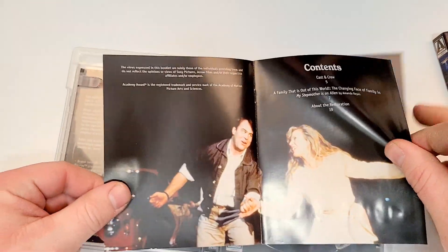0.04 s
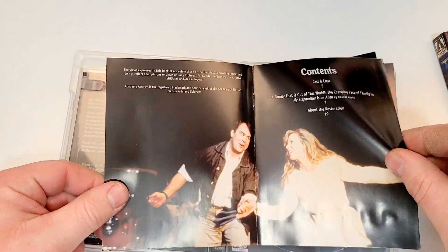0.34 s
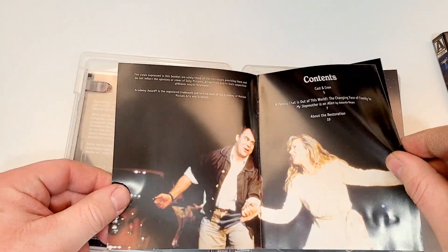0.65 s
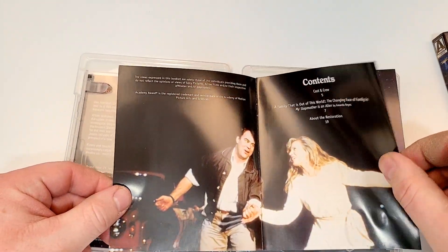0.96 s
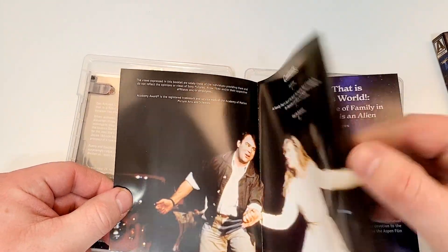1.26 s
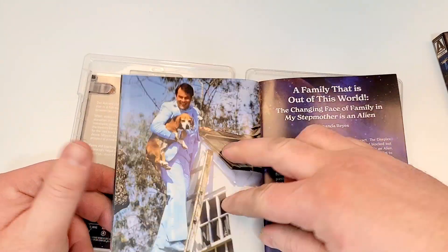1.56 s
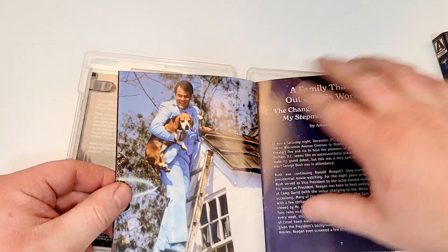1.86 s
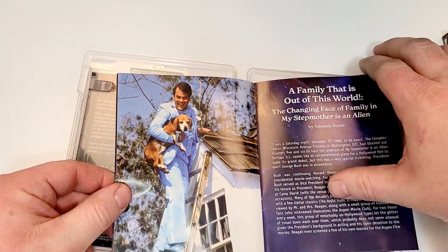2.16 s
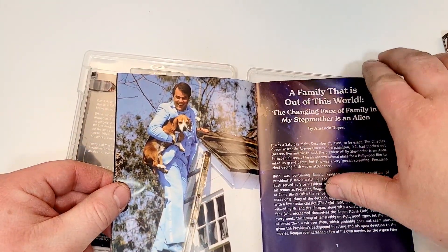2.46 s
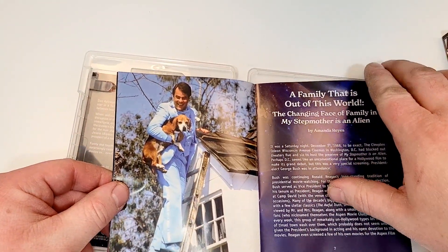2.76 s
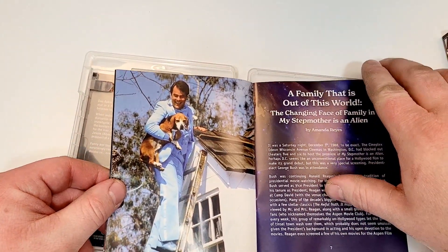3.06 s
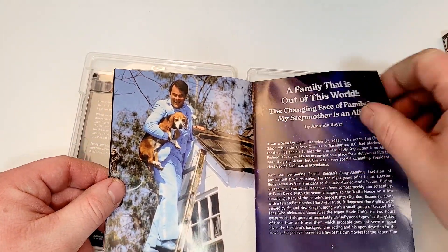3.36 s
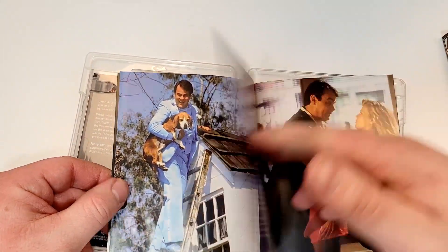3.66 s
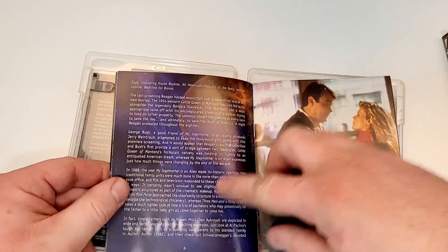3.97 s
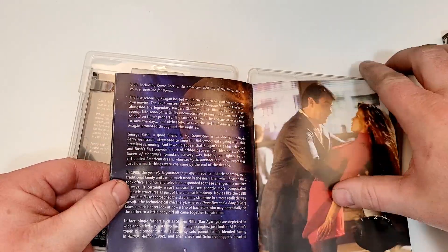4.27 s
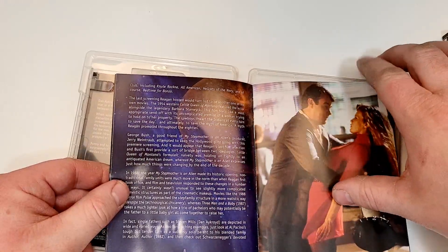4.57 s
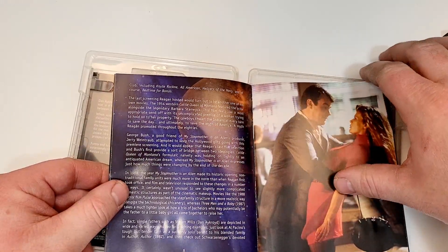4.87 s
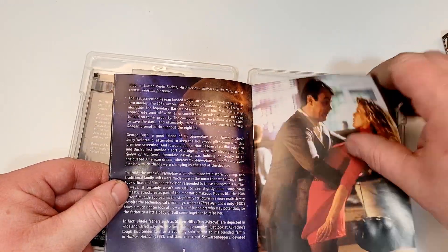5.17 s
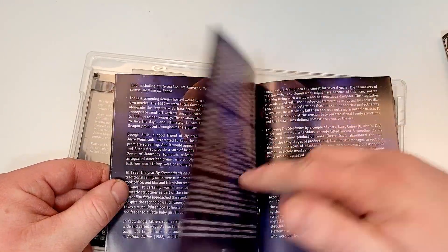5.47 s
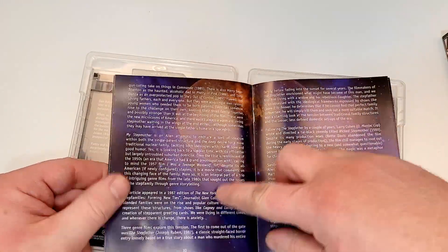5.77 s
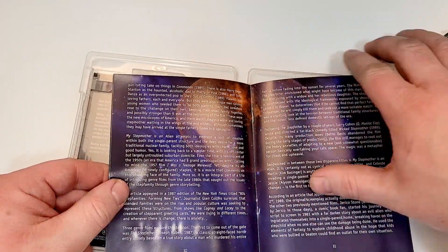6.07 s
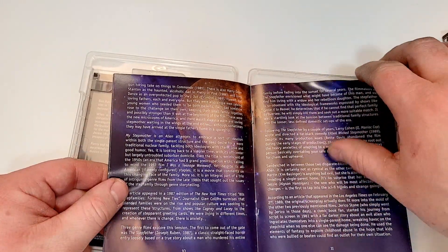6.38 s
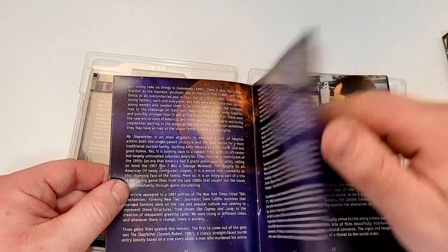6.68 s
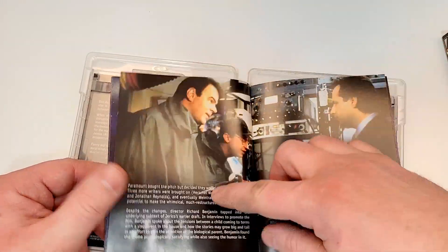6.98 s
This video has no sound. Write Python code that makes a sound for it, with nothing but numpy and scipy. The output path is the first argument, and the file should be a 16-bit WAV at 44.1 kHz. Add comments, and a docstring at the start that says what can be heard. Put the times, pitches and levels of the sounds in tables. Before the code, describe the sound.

Hands turn four glossy pages of a small booklet on a table, heard close in a small room. From the start the paper rustles and flexes, with a flick at about 0.7 seconds and a faint, thin squeal around 1 second. The first page snaps and flaps over between 1.2 and 1.5 seconds. Quiet sliding and tiny ticks follow. From 3 to 3.5 seconds come loud, sharp snaps as the second sheet buckles, and it flutters down by 3.8 seconds. Lighter clicks and finger slides continue until the third page flaps over at about 5.5 seconds. Crisp snaps near 6.4 seconds and a loud crack at 6.8 mark the fourth turn, which settles with small flaps just after 7 seconds. Soft, low puffs of air and a faint hiss lie underneath, along with a low drone that grows slightly from about 5 seconds.

```python
"""Sharp paper snaps, flaps and rustles: hands turn four glossy pages of a small booklet on a table,
close by in a small room. A stiff sheet buckles with an impulse that sends bending waves across it,
then swings over and flaps down, ringing the air pocket beneath it. Stick-slip friction of fingers
and pages gives the rustle and one thin squeal. Soft puffs of air, a low drone and a faint hiss
lie underneath."""
import sys
import numpy as np
from scipy import signal
from scipy.fft import rfft, irfft, next_fast_len
from scipy.io import wavfile
from scipy.ndimage import uniform_filter1d, map_coordinates

SR = 44100
rng = np.random.default_rng(int(sys.argv[2]) if len(sys.argv) > 2 else 0)


def transcribe(u):
    """Save the signal u as a 16-bit wav file named by the first command-line argument.

    u: samples, shape (n,) or (channels, n), limited to [-1, 1]; the rate is SR.
    q: integer samples, one column per channel.
    """
    v = np.clip(np.atleast_2d(u).T, -1, 1)
    q = np.round(v * 32767).astype(np.int16)
    wavfile.write(sys.argv[1], SR, q)


N = 318843

# a sheet buckles or its edge slips off a finger: start_s, peak_db, edge_db, ring_t60_s
SNAPS = [(0.054, -19, -5.5, 0.076), (0.221, -23, 16, 0.02), (0.657, -12, -0.5, 0.029),
         (1.188, -12, -6.5, 0.048), (1.202, -6.5, -4, 0.026), (1.25, -15, 8, 0.0081),
         (1.4, -19, -11, 0.018), (1.517, -24, -2, 0.019), (1.629, -26, 13, 0.033),
         (2.019, -31.5, 0.5, 0.026), (2.17, -37, 0, 0.021), (2.429, -33.5, 1, 0.024),
         (2.656, -29.5, 14, 0.025), (2.726, -31, 4, 0.041), (2.9443, -16, 8, 0.025),
         (2.9934, -20.5, 21, 0.024), (3.011, -33, 17, 0.055), (3.0992, 1.5, 2.5, 0.014),
         (3.1408, -20.5, 0, 0.016), (3.2033, -22, 3.5, 0.063), (3.2545, -13.5, -4, 0.026),
         (3.3556, 1, -4.5, 0.032), (3.416, 1.5, 18, 0.014), (3.51, -17, 7, 0.012), (3.585, -21.5, 5, 0.029),
         (3.973, -20.5, -1.5, 0.075), (4.152, -24, -9, 0.042), (4.287, -19.5, 8, 0.031),
         (4.305, -13.5, 10, 0.028), (4.893, -15.5, 12.5, 0.018), (4.9171, -16, 7.5, 0.049),
         (6.29, -26, 5, 0.045), (6.333, -21, 3, 0.022), (6.3517, -2.5, -0.5, 0.017),
         (6.446, -5.5, 3, 0.024), (6.7736, -19.5, 6, 0.013), (6.8211, 0.5, 13.5, 0.026),
         (7.1532, -16.5, 16, 0.01)]
# spectrum of a snap: frequency_hz, gain_db
SNAP_SPECTRUM = [(40, -35), (150, 4.5), (1100, -5.5), (1800, 3), (3000, -2), (5000, -6.5), (9500, -14.5),
                 (16000, -24)]


def snaps(shiver=0.23):
    """Buckling: one sudden impulse, then decaying bending waves that cross the sheet."""
    out, t = np.zeros(N), np.arange(SR // 8) / SR
    for start_s, peak_db, edge_db, t60 in SNAPS:
        body_db = -7 - 0.63 * edge_db - 0.18 * peak_db  # a tight, hard snap moves little paper
        kick = shiver * rng.standard_normal(len(t)) * amp(-60 * t / t60)
        kick[0] = -1
        snap = filtered(kick, lambda hz: along(SNAP_SPECTRUM, hz) + booklet(hz)
                        + radiation(hz, body_db, edge_db))
        snap = table_echo(snap, delay_s=.00083, share=.45)
        add(out, start_s, amp(peak_db) * snap / np.abs(snap).max())
    return out


def radiation(hz, body_db, edge_db, body_hz=800, edge_hz=4200):
    """Radiator size, as gain in dB: a large moving area adds bass, a tight crease adds treble."""
    return body_db / (1 + (hz / body_hz) ** 4) + edge_db * (1 - 1 / (1 + (hz / edge_hz) ** 4))


def table_echo(x, delay_s, share):
    """Dipole reflection: the sheet's back radiates in opposite phase and returns off the table."""
    return x - share * np.pad(x, (round(delay_s * SR), 0))[:len(x)]


# a bowed sheet flaps over or lands: start_s, peak_db, pocket_pitch_hz, flutter_t60_s
FLAPS = [(0.668, -9.5, 1870, 0.12), (0.723, -22.5, 1390, 0.072), (1.214, -10.5, 1450, 0.22),
         (1.261, -16, 1110, 0.11), (1.4142, -3, 1790, 0.17), (1.9027, -22.5, 1840, 0.2),
         (2.264, -38, 950, 0.029), (2.358, -44, 1780, 0.038), (3.459, -9, 1600, 0.03),
         (3.61, -17.5, 1480, 0.31), (3.641, -18.5, 1280, 0.12), (3.724, -22, 1700, 0.025),
         (3.735, -15.5, 1680, 0.089), (5.26, -22.5, 1090, 0.07), (5.314, -25, 1400, 0.06),
         (5.363, -22, 1400, 0.059), (5.522, -13, 1660, 0.049), (5.535, -8, 1740, 0.14),
         (6.722, -24, 1020, 0.089), (6.831, -17.5, 1850, 0.044), (6.922, -26.5, 1610, 0.044),
         (7.032, -26.5, 1830, 0.034), (7.127, -23, 990, 0.017)]
# spectrum of a flap: frequency_hz, gain_db
FLAP_SPECTRUM = [(40, -1), (150, -20), (1500, -6.5), (2600, -7.5), (8000, -28.5), (16000, -41)]


def flaps(lead_s=.02, slap_t60_s=0.03, settle_s=0.006, neutral_hz=1640, body_db_per_octave=22.5):
    """Impact and settling: a bright slap, then a weaker, lower and duller flutter."""
    out, t = np.zeros(N), np.arange(SR // 4) / SR - lead_s
    for start_s, peak_db, pitch_hz, t60 in FLAPS:
        body_db = body_db_per_octave * np.log2(neutral_hz / pitch_hz)  # bigger pocket: lower, fuller
        slap = contact(t, pitch_hz, min(t60, slap_t60_s), body_db, edge_db=3.5)
        settle = contact(t, 0.96 * pitch_hz, t60, body_db, edge_db=-12.5)
        add(out, start_s - lead_s, amp(peak_db) * slap)
        add(out, start_s + settle_s - lead_s, amp(peak_db - 6) * settle)
    return out


def contact(t, pitch_hz, t60, body_db, edge_db, rise_s=0.0028):
    """Noise excitation: the sheet brushes closer, then shudders and rings its air pocket; peak 1."""
    envelope = np.where(t < 0, np.exp(-np.abs(t) / rise_s), amp(-60 * np.abs(t) / t60))
    shudder = rng.standard_normal(len(t)) * envelope
    flap = filtered(shudder, lambda hz: along(FLAP_SPECTRUM, hz) + booklet(hz)
                    + pocket(hz, pitch_hz, ring_db=11, width=0.18) + radiation(hz, body_db, edge_db))
    return flap / np.abs(flap).max()


def pocket(hz, pitch_hz, ring_db, width):
    """Cavity resonance under a bowed sheet, as gain in dB; width is a share of its pitch."""
    return ring_db / (1 + ((hz / pitch_hz - 1) / width) ** 2)


# spectra of a page swinging, flexing and sliding: frequency_hz, gain_db
SWING_SPECTRUM = [(60, -40), (180, -4), (380, 2), (600, -4.5), (850, -6), (1400, -8), (3000, -26)]
FLEX_SPECTRUM = [(400, -50.5), (850, -1.5), (1300, -4.5), (1800, 4.5), (2400, -4.5), (3300, -6.5),
                 (5000, -11), (12000, -32)]
SLIDE_SPECTRUM = [(1200, -21.5), (3000, -7.5), (4200, -1), (5200, -4), (6200, 1), (7000, -3.5), (8200, -2),
                  (10000, -2.5), (12500, -5.5), (15500, -8)]


def rustle(grip_db=2.5, grip_rate_hz=70, pockets_hz=(1080, 1760, 2900)):
    """Modulated friction noise: the fingers' uneven grip shakes swing, flex and slide together."""
    swing_db, flex_db, slide_db = page_motion()
    swing = amp(swing_db - 7.5) * friction(SWING_SPECTRUM, slips_per_s=160, spread_db=2.0, smooth=0.69)
    bending = friction(FLEX_SPECTRUM, slips_per_s=220, spread_db=12.5, smooth=2.7)
    hollow, bowed, tight = [unit(filtered(bending, lambda hz: pocket(hz, pitch, ring_db=7, width=0.16)))
                            for pitch in pockets_hz]
    # a sliding page lies flat and sounds high; as it lifts, its pocket grows and the pitch falls
    flatness = np.clip((slide_db - swing_db + 5) / 12, -1, 1)
    lifted, flat = np.maximum(-flatness, 0), np.maximum(flatness, 0)
    flex = amp(flex_db - 8) * (lifted * hollow + (1 - lifted - flat) * bowed + flat * tight)
    slide = amp(slide_db - 2.5) * friction(SLIDE_SPECTRUM, slips_per_s=470, spread_db=3, smooth=1.5)
    paper = shape_shift(filtered(swing + flex + slide, booklet))
    return paper * amp(grip_db * wobble(grip_rate_hz))


# a finger or page edge slides over the gloss: start_s, length_s, hiss_db, flex_over_hiss_db
SLIDES = [(0.106, 0.051, -43, 6), (0.214, 0.031, -38, 8.5), (0.633, 0.063, -39.5, 11),
          (1.116, 0.18, -41.5, 7), (1.302, 0.056, -44.5, 9), (1.592, 0.1, -45.5, 3.5),
          (1.745, 0.42, -49, 5), (2.118, 0.05, -51.5, 9), (2.658, 0.039, -54.5, 11), (2.984, 0.06, -37, -1),
          (3.202, 0.019, -39, 4), (3.26, 0.086, -36.5, 1), (3.341, 0.16, -35.5, 9.5),
          (3.634, 0.13, -40.5, 8), (3.855, 0.15, -42.5, -7), (4.038, 0.039, -36, 4),
          (4.094, 0.065, -49.5, 6.5), (4.216, 0.051, -43.5, 4), (4.296, 0.06, -40.5, 9),
          (4.657, 0.053, -42.5, 2), (4.76, 0.12, -53, 9.5), (4.933, 0.035, -41, 9.5), (5.02, 0.062, -30, 4),
          (5.099, 0.082, -40, 8), (5.208, 0.088, -40.5, 2), (5.671, 0.16, -41, 4), (5.834, 0.1, -54.5, 7),
          (6.092, 0.1, -54, 7), (6.17, 0.19, -48, 3), (6.46, 0.15, -41, 5), (6.63, 0.39, -47, 6.5),
          (6.816, 0.043, -33, 8), (7.061, 0.1, -39.5, -1.5)]
# a page is bent, lifted or swung over: start_s, length_s, flex_db, swing_over_flex_db
BENDS = [(0.0, 0.15, -32, -10.5), (0.194, 0.1, -38.5, -0.5), (0.325, 0.2, -39.5, -7.5),
         (0.496, 0.013, -31, -38), (0.563, 0.22, -41, 0.5), (0.773, 0.13, -31, -5), (0.928, 0.18, -40, 0),
         (1.153, 0.11, -25, -8), (1.318, 0.04, -29, -8), (1.433, 0.025, -31.5, -0.5),
         (1.505, 0.019, -31.5, -5.5), (1.6, 0.022, -38, -4), (3.089, 0.083, -42, -14),
         (3.343, 0.17, -29.5, -27), (3.503, 0.02, -28.5, -1), (3.586, 0.15, -32.5, -1),
         (3.843, 0.18, -42, -5.5), (5.261, 0.076, -37.5, 0.5), (5.359, 0.072, -31.5, -4.5),
         (5.559, 0.035, -37, -9), (5.668, 0.085, -37.5, -5), (6.641, 0.15, -43.5, -1),
         (6.999, 0.025, -30.5, -7.5)]


def page_motion(held_db=-56.5, lift_db_per_s=10, slide_swing_db=-8, bend_hiss_db=-14.5):
    """Incoherent sources add in power: relative dB of swing, flex and slide over all the strokes."""
    t = np.arange(0, N / SR, .001)
    swing, flex, slide = np.full((3, len(t)), amp(held_db) ** 2)
    for start_s, length_s, hiss_db, flex_db in SLIDES:
        age = t - start_s
        power = amp(hiss_db) ** 2 * stroke(age, length_s, attack_s=.037, sag_db_s=17.6, release_s=.022)
        # as the page lifts off, its hiss gives way to flexing and stirred air
        lift_db = lift_db_per_s * (np.clip(age, 0, length_s) - length_s / 2)
        slide += power * amp(-lift_db / 2) ** 2
        flex += power * amp(flex_db + lift_db / 2) ** 2
        swing += power * amp(slide_swing_db + lift_db) ** 2
    for start_s, length_s, flex_db, swing_db in BENDS:
        age = t - start_s
        power = amp(flex_db) ** 2 * stroke(age, length_s, attack_s=.025, sag_db_s=2.7, release_s=.029)
        flex += power
        swing += power * amp(swing_db) ** 2
        slide += power * amp(bend_hiss_db) ** 2
    return curves(np.column_stack([t, *10 * np.log10([swing, flex, slide])]))


def stroke(t, length_s, attack_s, sag_db_s, release_s):
    """Power envelope of a hand movement: it swells, sags by sag_db_s dB a second and dies away."""
    swell = np.clip(t / attack_s + .5, 0, 1)
    sag = amp(-sag_db_s * np.clip(t, 0, length_s))
    release = np.exp(-np.maximum(t - length_s, 0) / release_s)
    return (swell * sag * release) ** 2


def friction(spectrum, slips_per_s, spread_db, smooth):
    """Stick-slip friction: tiny random slips of uneven size on a smooth rub, rms 1."""
    slipping = rng.random(N) < slips_per_s / SR
    sizes = amp(spread_db * np.clip(rng.standard_normal(N), -2, 2))
    slips = slipping * sizes * rng.choice([-1, 1], N)
    rub = unit(slips) + smooth * rng.standard_normal(N)
    return unit(filtered(rub, lambda hz: along(spectrum, hz)))


def shape_shift(x, depth_db=2, size=512):
    """Time-varying filtering: the sheet changes shape, so patches of its spectrum swell and fade."""
    spectra = signal.stft(x, nperseg=size)[2]
    patches = uniform_filter1d(rng.standard_normal(spectra.shape), size=4, axis=0)
    patches = uniform_filter1d(patches, size=12, axis=1)
    return signal.istft(spectra * amp(depth_db * unit(patches)), nperseg=size)[1][:N]


# one glossy sheet sings thinly as it is drawn across another: time_s, pitch_hz, level_db
SQUEAL = [(.92, 5150, -67), (1.07, 5050, -49), (1.2, 5300, -48)]


def squeal(width_hz=800):
    """Narrow-band noise: fast, uneven stick-slip between glossy faces gives a breathy high tone."""
    pitch_hz, level_db = curves(SQUEAL)
    phase = 2 * np.pi * np.cumsum(pitch_hz) / SR
    band = wobble(width_hz) * np.sin(phase) + wobble(width_hz) * np.cos(phase)
    t = np.arange(N) / SR
    return amp(level_db) * unit(band) * (t > SQUEAL[0][0]) * (t < SQUEAL[-1][0])


# resonances of the open booklet on its plastic case: centre_hz, width_hz, gain_db
BOOKLET_MODES = [(642, 330, 5), (1208, 280, 6), (1760, 97, 5), (1760, 110, -5), (2390, 85, 3.5)]


def booklet(hz):
    """Body resonance: the gain in dB with which the booklet colours snaps, flaps and rustle."""
    return sum(db / (1 + (2 * (hz - centre) / width) ** 2) for centre, width, db in BOOKLET_MODES)


# decay of the small room: frequency_hz, t60_s
ROOM_DECAY = [(150, 0.43), (1500, 0.16), (5000, 0.21), (15000, 0.11)]


def room(x, first_wall_s=.009):
    """Reverberation: the walls answer after a short gap, and the bass lingers longest."""
    hz, t, spectra = signal.stft(rng.standard_normal(SR // 2), SR, nperseg=256)
    decay = amp(-60 * t / along(ROOM_DECAY, hz)[:, None])
    tail = signal.istft(spectra * decay, SR, nperseg=256)[1]
    tail = np.pad(tail / np.linalg.norm(tail), (round(first_wall_s * SR), 0))
    return signal.fftconvolve(x, tail)[:N]


# air pushed by pages and hands: time_s, relative_level_db
DRAUGHT = [(0, -47), (.15, -33.5), (.35, -47), (1.02, -39.5), (1.15, -33.5), (1.55, -41.5), (2.4, -50.5),
           (3.7, -44), (4.7, -50.5), (5.4, -43.5), (6, -47), (7.23, -44)]
# spectrum of that air: frequency_hz, gain_db
AIR_SPECTRUM = [(25, -16), (80, 4.5), (120, -4), (350, -15.5), (900, -72.5)]


def draught(gust_db=2, gust_rate_hz=6):
    """Air displacement: moving pages and hands make soft, low puffs."""
    level_db, = curves(DRAUGHT)
    gusts = amp(gust_db * wobble(gust_rate_hz))
    return amp(level_db - 1.5) * unit(noise(AIR_SPECTRUM) * gusts)


# low drone in the room: time_s, pitch_hz, level_db
DRONE = [(0, 56.25, -50.5), (4.7, 56.6, -47.5), (5.4, 52.9, -40.5), (6.4, 50.53, -38.5), (7.23, 49, -40)]
# spectrum of the faint hiss: frequency_hz, gain_db
HISS_SPECTRUM = [(40, 9), (100, -21), (300, -39), (750, -16.5), (2000, -15.5), (5000, -25), (14500, -20),
                 (16000, -22)]


def background(waver_hz=2.55, flicker_db=1.5, hiss_db=-53):
    """Random modulation: a low sine wavers in pitch and level over a steady hiss."""
    pitch_hz, level_db = curves(DRONE)
    phase = 2 * np.pi * np.cumsum(pitch_hz + waver_hz * wobble(6.7)) / SR
    drone = np.sin(phase) * amp(flicker_db * wobble(27))
    return amp(level_db) * unit(drone) + amp(hiss_db) * noise(HISS_SPECTRUM)


def noise(spectrum):
    """Steady filtered noise of rms 1."""
    return unit(filtered(rng.standard_normal(N), lambda hz: along(spectrum, hz)))


def filtered(x, gain_db, size=8192):
    """Minimum-phase filtering; gain_db is a function of frequency."""
    cepstrum = irfft(np.log(amp(gain_db(np.fft.rfftfreq(size, 1 / SR)))))
    cepstrum[1:size // 2] *= 2
    cepstrum[size // 2 + 1:] = 0
    return signal.oaconvolve(x, irfft(np.exp(rfft(cepstrum))))[:len(x)]


def wobble(rate_hz):
    """A smooth random curve with rate_hz knots a second."""
    knots = rng.standard_normal(int(N * rate_hz / SR) + 4)
    return map_coordinates(knots, [np.arange(N) * rate_hz / SR])


def curves(rows):
    """Linear interpolation: one value per sample for each column after the time."""
    times, *columns = np.transpose(rows)
    return [np.interp(np.arange(N) / SR, times, column) for column in columns]


def along(points, hz):
    """Interpolation of (frequency_hz, value) points on a log frequency axis."""
    frequencies, values = np.transpose(points)
    return np.interp(np.log(hz + 1), np.log(frequencies + 1), values)


def amp(db):
    """Decibels to gain."""
    return 10 ** (np.asarray(db) / 20)


def unit(x):
    """Normalisation to rms 1."""
    return x / np.sqrt(np.mean(x ** 2) + 1e-20)


def add(track, start_s, x):
    """Mix x into the track from start_s on."""
    part = track[round(start_s * SR):][:len(x)]
    part += x[:len(part)]


def scene(room_db=-12):
    """Superposition: direct paper sound, its reverberation, the draught and the background."""
    paper = snaps() + flaps() + rustle() + squeal()
    walls = room(amp(room_db) * paper)
    return (paper + walls + draught() + background())[None]


def record(dry, low_hz=32, top_hz=16050):
    """Band limiting: the deepest bass is cut, peaks clip at full scale, nothing passes above top_hz."""
    thin = signal.sosfilt(signal.butter(2, low_hz, "hp", fs=SR, output="sos"), dry)
    size = next_fast_len(N + SR // 2)
    spectrum = rfft(np.clip(thin, -1, 1), size)
    passband = np.fft.rfftfreq(size, 1 / SR) < top_hz
    return irfft(spectrum * passband, size)[..., :N]


dry = scene()
out = record(dry)
transcribe(out)
```